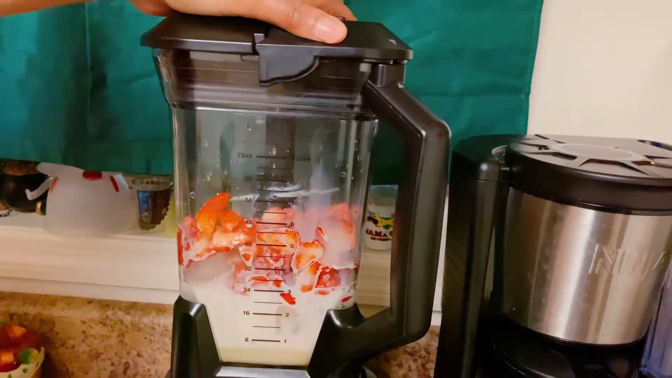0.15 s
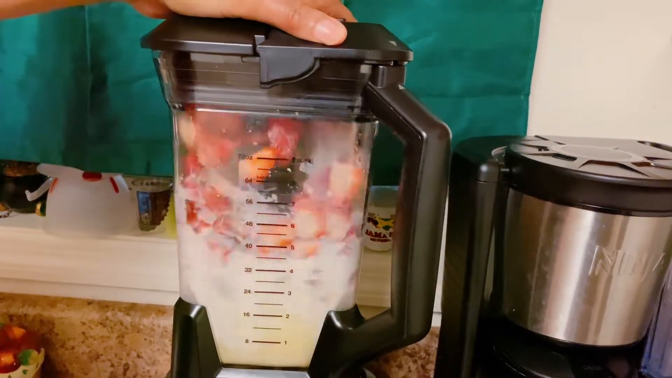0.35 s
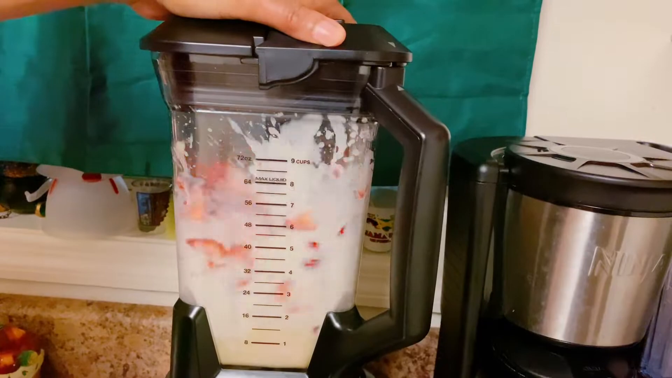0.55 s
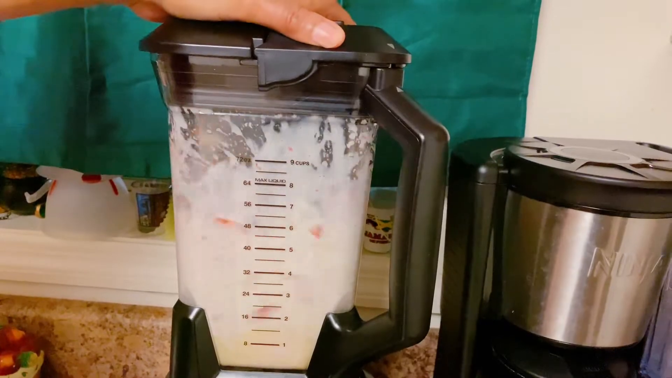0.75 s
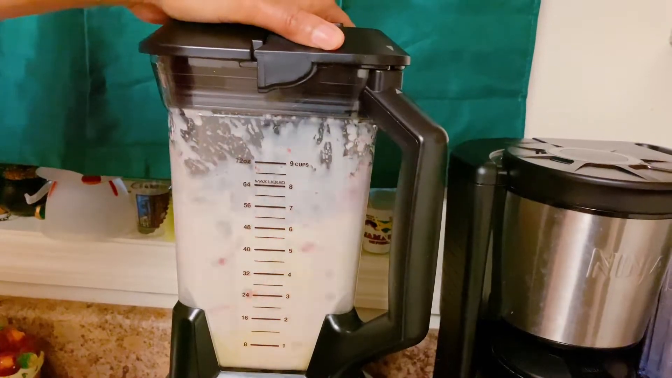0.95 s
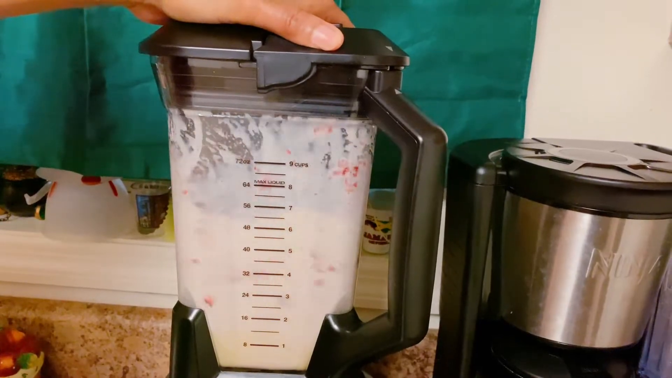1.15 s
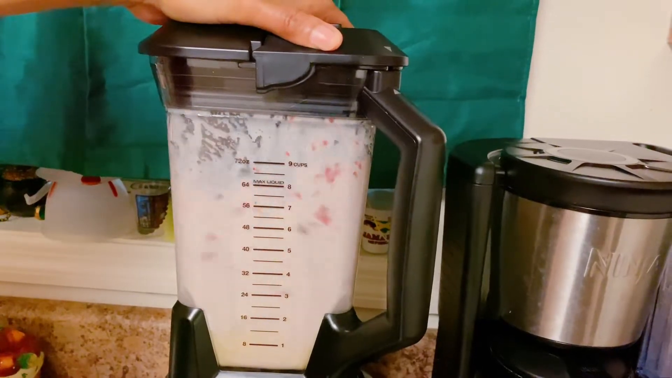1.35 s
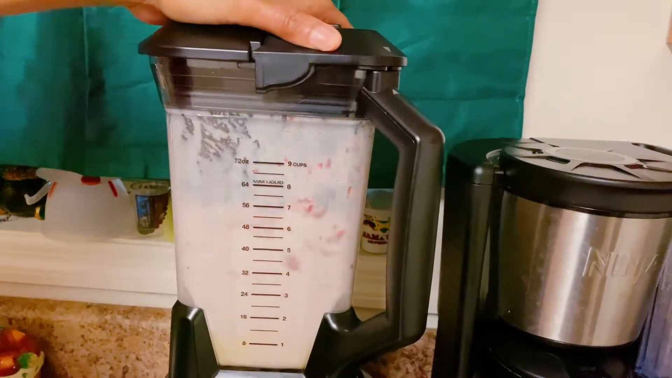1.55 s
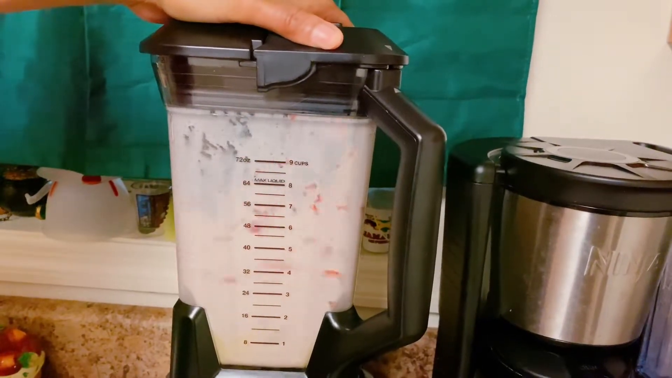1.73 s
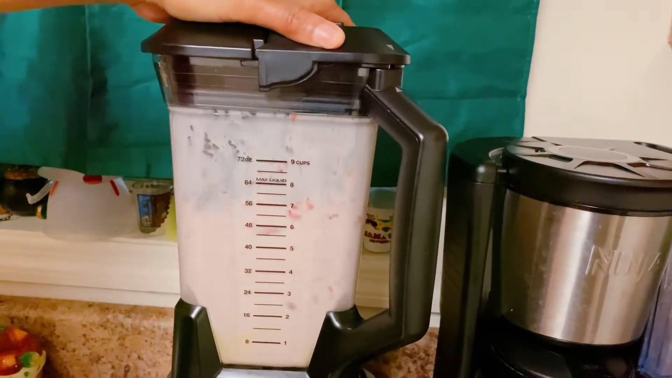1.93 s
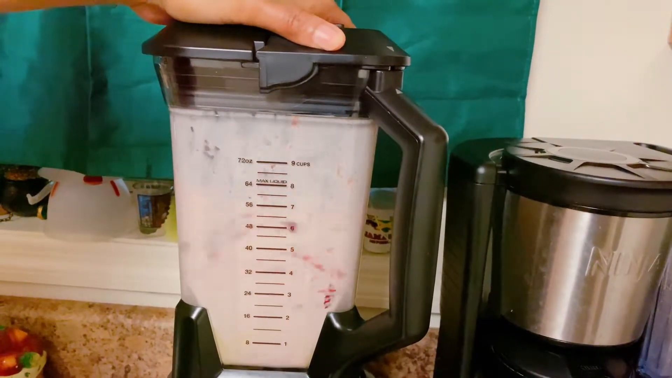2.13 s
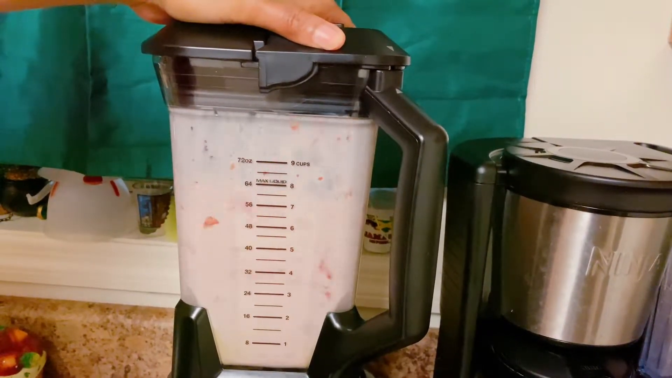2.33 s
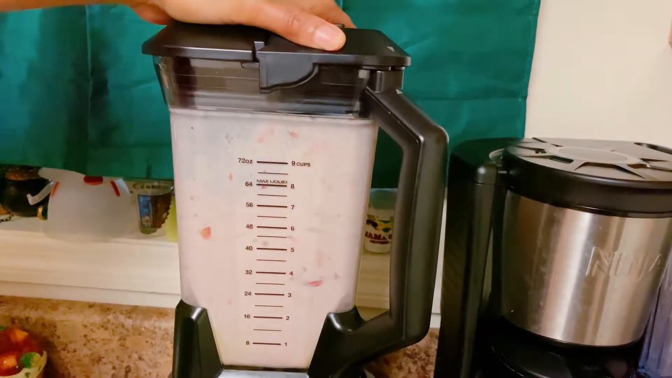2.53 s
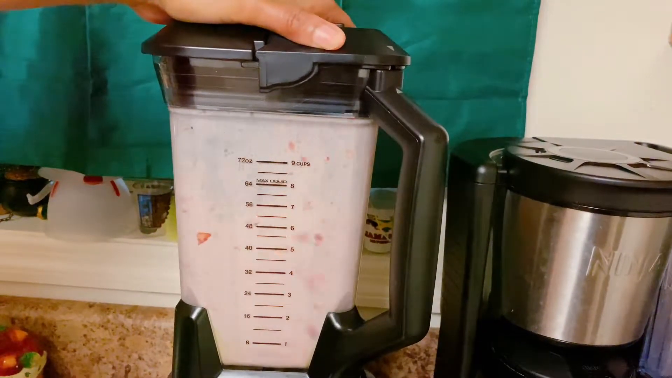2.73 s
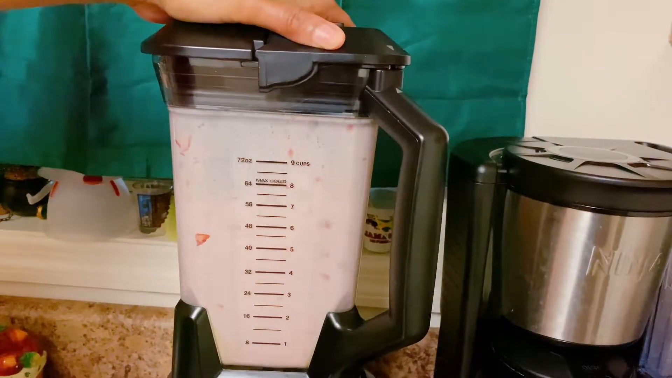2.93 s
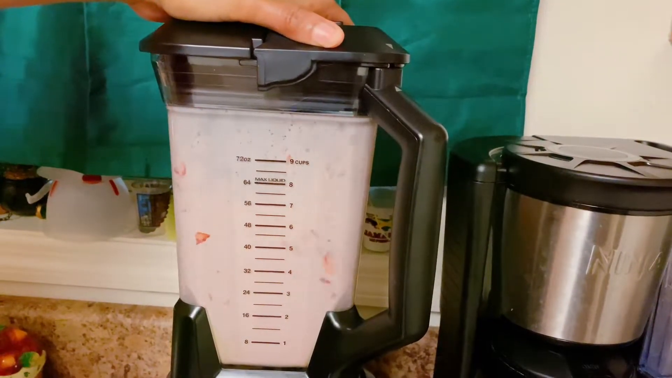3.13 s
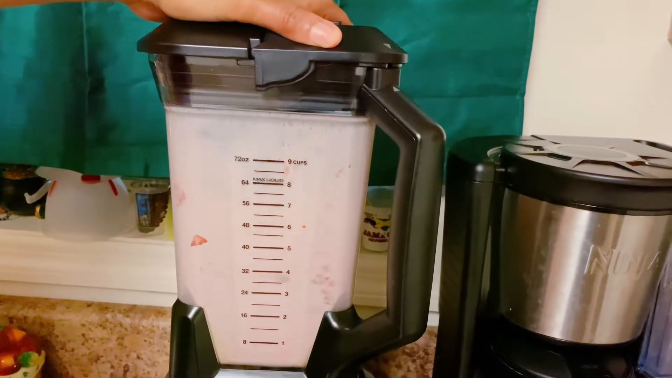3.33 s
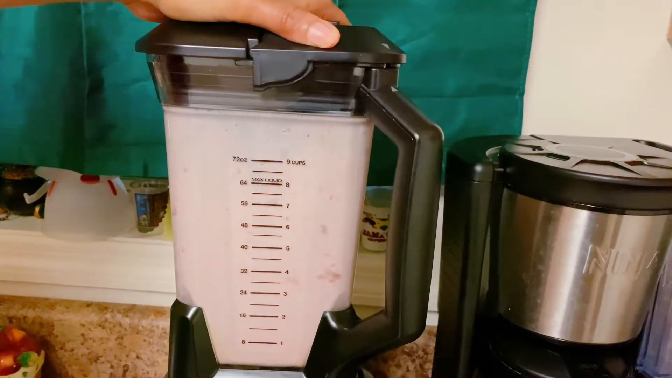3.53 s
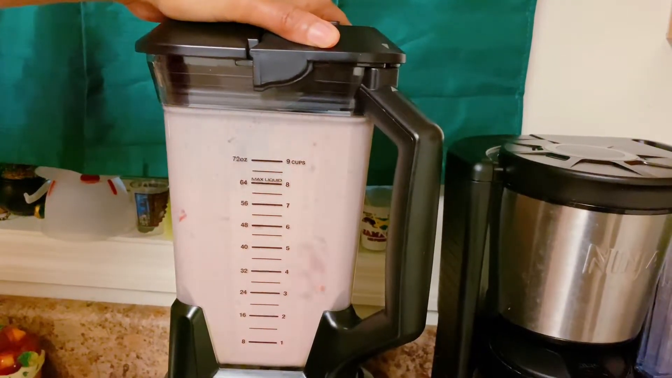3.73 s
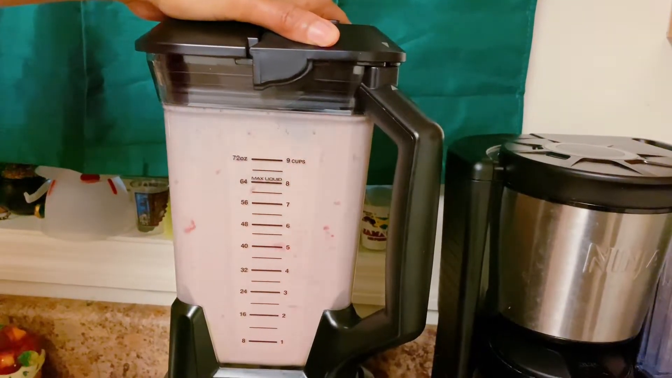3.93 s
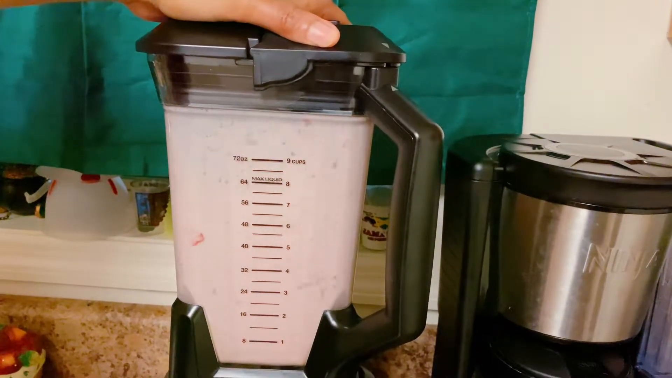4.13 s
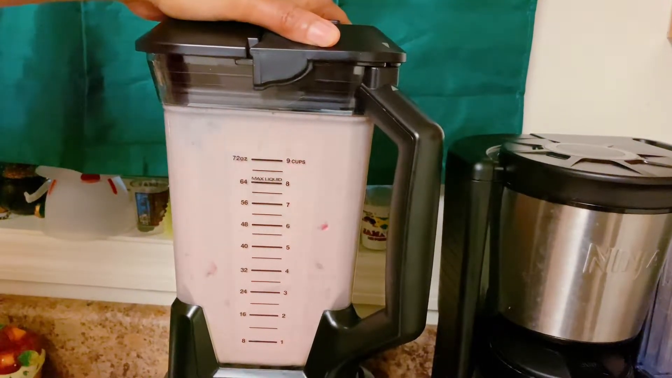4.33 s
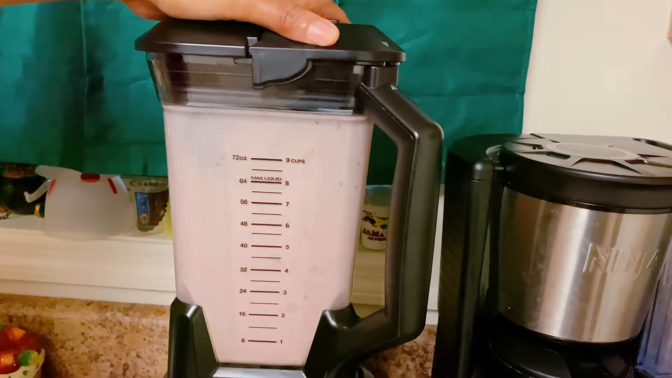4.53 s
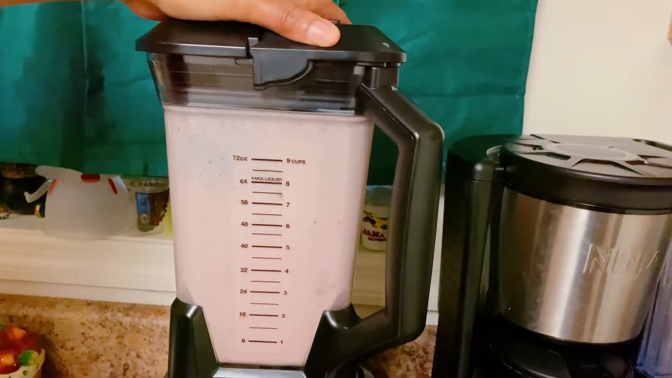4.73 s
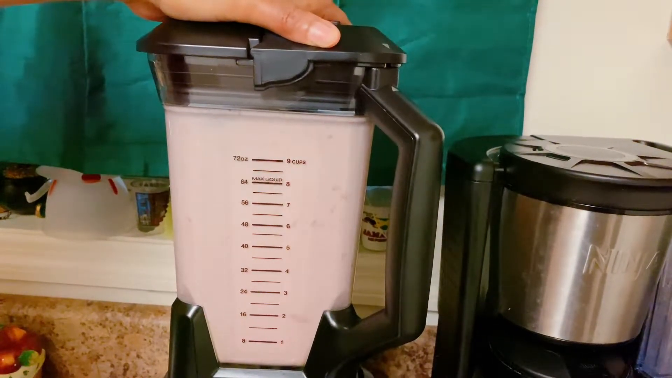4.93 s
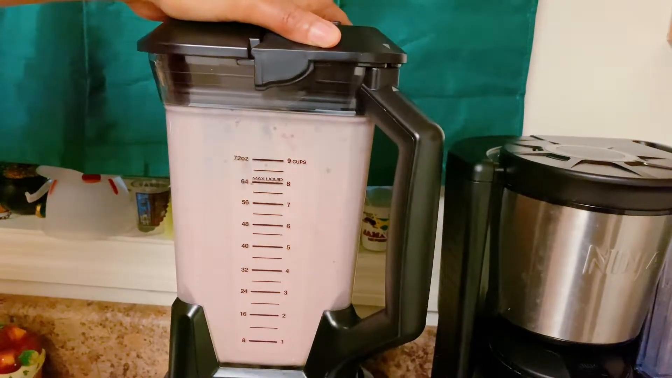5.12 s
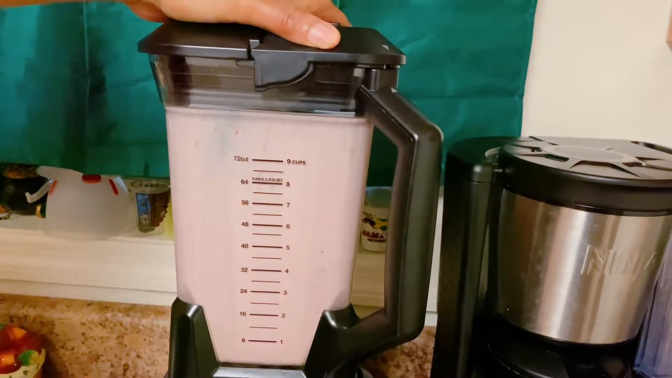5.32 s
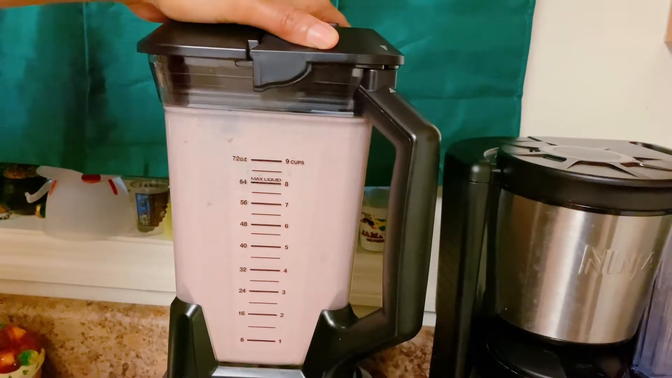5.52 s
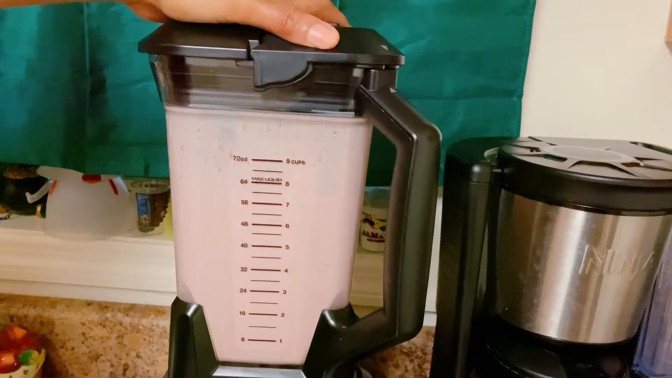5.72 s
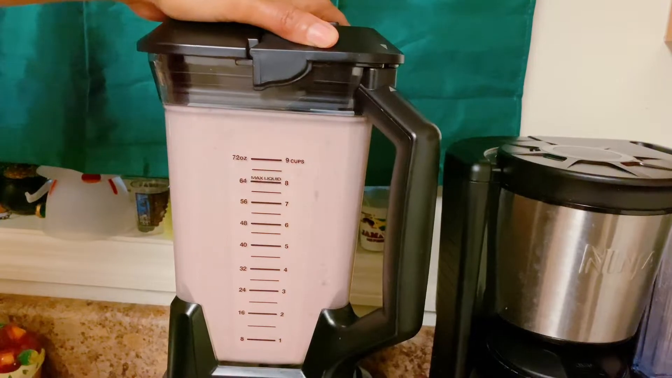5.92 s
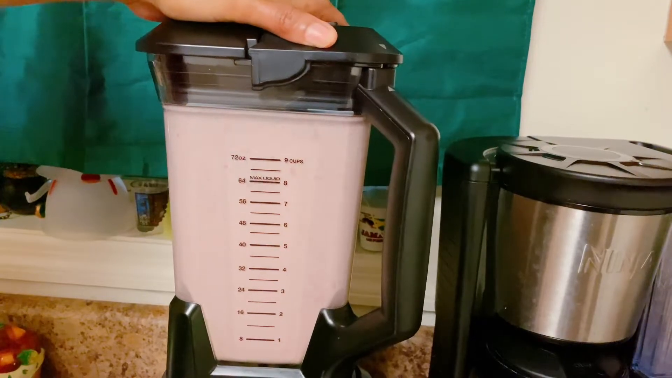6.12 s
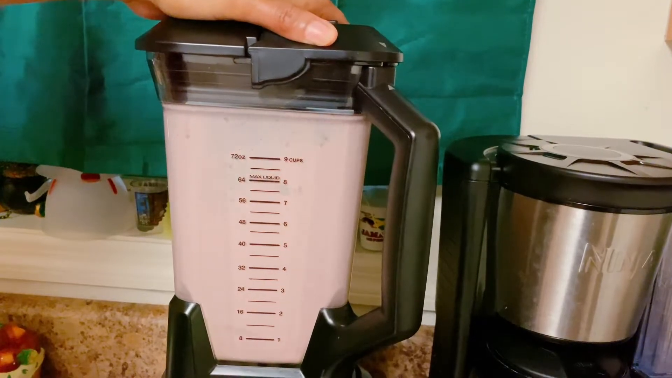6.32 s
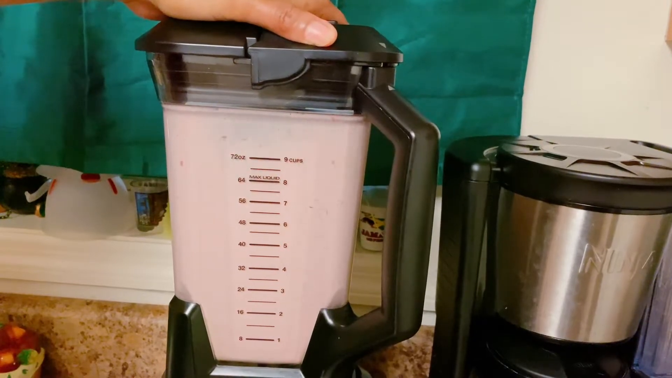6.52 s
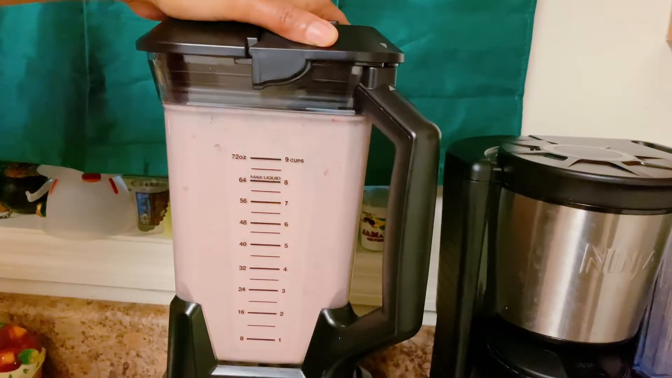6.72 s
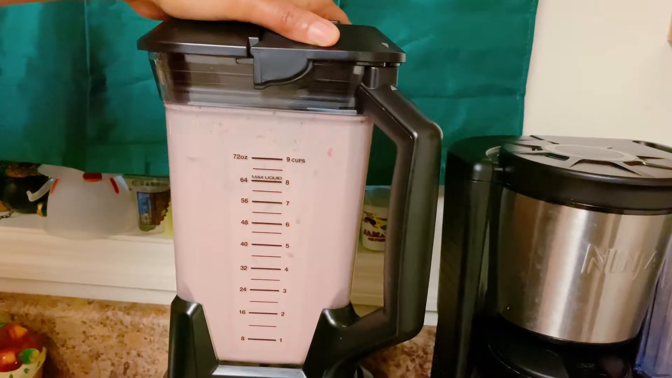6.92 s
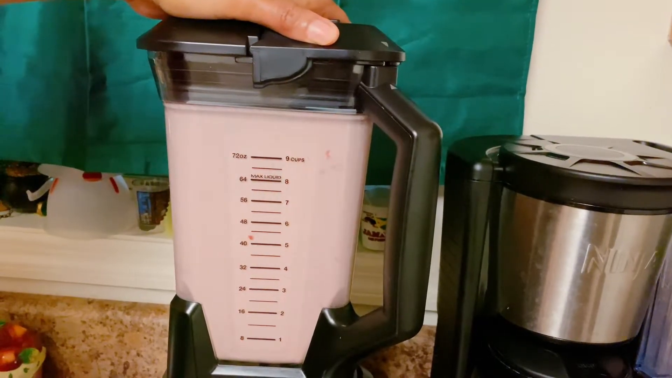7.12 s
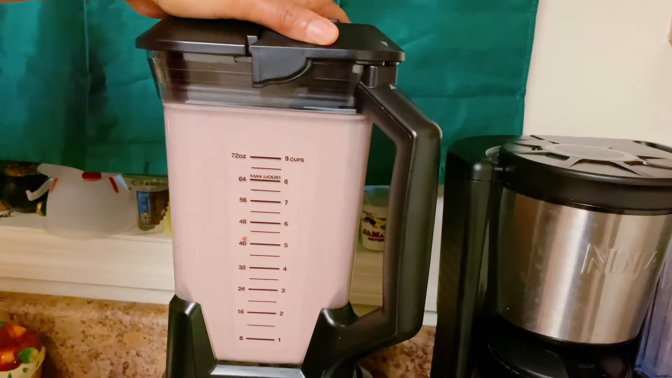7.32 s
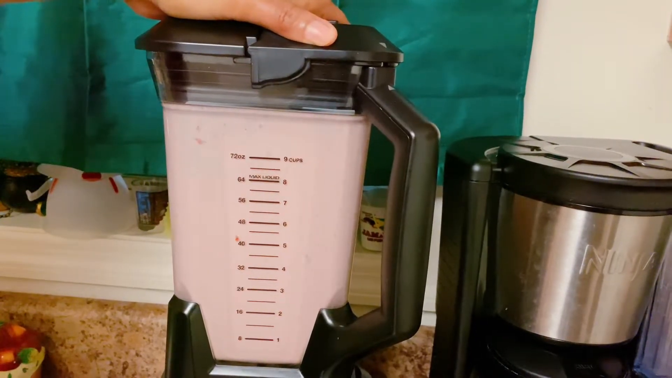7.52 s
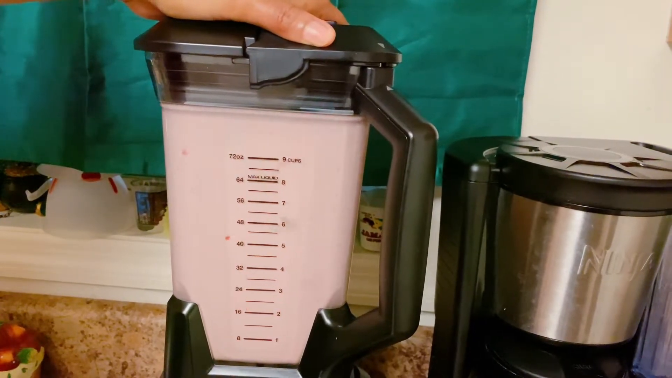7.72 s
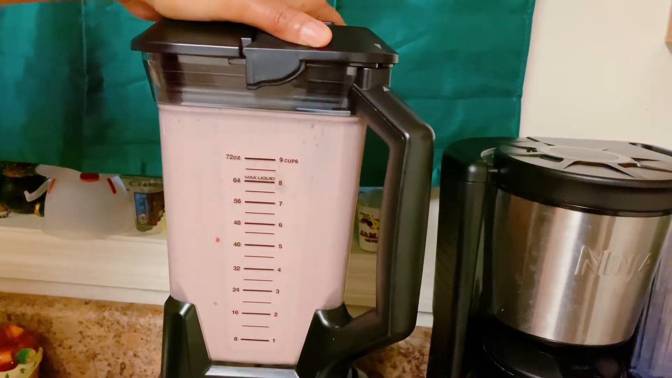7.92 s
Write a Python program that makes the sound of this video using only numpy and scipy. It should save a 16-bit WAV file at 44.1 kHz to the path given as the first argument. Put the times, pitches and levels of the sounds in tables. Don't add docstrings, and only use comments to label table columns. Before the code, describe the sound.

Close stereo sound in a small kitchen. For the first 0.1 s there is only faint refrigerator hum and dull room air, then a small plastic click with tiny bounces. At about 0.19 s the blender bursts on: the motor sweeps from a low growl to a high hum by 0.7 s, while ice chunks crack and knock hollowly on the jug, thickest until 0.6 s, with later knocks near 0.7 and 0.9 s. Chips rattle and thin out by 2 s. A loud, broad, wet roar with motor whine continues, pitch still creeping upward until about 4 s, pulsing roughly six times a second. From about 4.7 s the mix thickens: deeper surges come three times a second, each a brighter splash and hum swell followed by a sag in pitch and low jug wobble. Soft low thuds appear from 5 s, strongest near 6 and 7.9 s. It is still running at the end, about 8 s.

```python
import sys
import numpy as np
from scipy import signal
from scipy.fft import rfft, irfft, next_fast_len
from scipy.io import wavfile
from scipy.ndimage import uniform_filter1d

SR = 44100
rng = np.random.default_rng(int(sys.argv[2]) if len(sys.argv) > 2 else 0)


def persist_wave(psi):
    counts = np.round(np.clip(psi, -1, 1) * 32767).astype(np.int16)
    wavfile.write(sys.argv[1], SR, np.atleast_2d(counts).T)


def ratio_of_db(decibels):
    return 10 ** (np.asarray(decibels, float) / 20)


N = 351036
SIZE = next_fast_len(N + SR)
HZ = np.maximum(np.arange(SIZE // 2 + 1) * SR / SIZE, 1)

# frequency in Hz, level difference in dB.
LEFT_LOUDER = [(60, 4), (110, -0.5), (200, 4.5), (380, -2), (700, 9.5), (1290, 4), (2380, 2.0), (4400, 1.5),
               (8120, 1), (15000, 0.0)]
# frequency in Hz, lead in cycles.
RIGHT_LEADS = [(0, 0), (1200, 0), (2400, -.2), (4100, 0), (5400, .5), (7300, 1.0), (9250, 1.5),
               (15300, 3.0), (22050, 4.7)]
PORT_HZ, PORT_DB = np.transpose(LEFT_LOUDER)
PORTS = ratio_of_db(np.interp(np.log(HZ), np.log(PORT_HZ), PORT_DB) * [[.5], [-.5]])
LEAD = np.exp(2j * np.pi * np.interp(HZ, *np.transpose(RIGHT_LEADS)) * [[0], [1]])
SIDES = np.array([[.5], [-.5]])


def rms_one(x):
    return x / np.sqrt(np.mean(x ** 2) + 1e-20)


def in_time(rows):
    s, *columns = np.transpose(rows)
    return [np.interp(np.arange(N) / SR, s, c) for c in columns]


def at_hz(points, hz):
    points = np.array(points)
    return np.interp(np.log(hz), np.log(np.maximum(points[:, 0], 1)), points[:, 1])


def drift(rate):
    r = np.exp(-80 * np.pi * rate / SR)
    slow = signal.lfilter([1], [1, -2 * r, r * r], rng.standard_normal(N // 40 + 2002))[2000:]
    return np.interp(np.arange(N) / 40, np.arange(len(slow)), rms_one(slow))


def ring(clicks, hz, t60):
    r, w = ratio_of_db(-60 / (t60 * SR)), 2 * np.pi * hz / SR
    return signal.lfilter([0, np.sin(w)], [1, -2 * r * np.cos(w), r * r], clicks + 1e-18)


def body_noise(spectrum, patchy_db, surge_db=0, dark_db=0, count=2):
    # frequency in Hz, width in Hz, boost in dB.
    body = [(126.3, 20, 6), (191.8, 6.2, 8), (242, 12, 10), (540, 105, -0.5), (730, 43, 3), (907, 44, 4.5),
            (1028, 64, 4.5), (1235, 54, 6.5), (1851, 62, 8.5), (2446, 65, 6), (2687, 230, 3.5),
            (3210, 25, 8.5), (3404, 126, 4), (4150, 46, 6), (4330, 90, 4), (5860, 73, 5)]
    # frequency in Hz, likeness from 0 to 1.
    likeness = [(60, 0.91), (200, 0.9), (500, 0.5), (900, 0.43), (1500, 0.14), (2800, 0.23), (3600, 0.2),
                (6000, 0.36), (8000, 0.9), (9200, 0.55), (16000, 0.35)]
    body_db = sum(boost_db / (1 + (2 * (HZ - hz) / width) ** 2) for hz, width, boost_db in body)
    inside = (HZ > spectrum[0][0]) & (HZ < spectrum[-1][0])
    white = rfft(rng.standard_normal((3, SIZE)))
    alike = np.clip(at_hz(likeness, HZ), 0, 1)
    direct = np.sqrt(alike) * white[0] * LEAD
    diffuse = np.sqrt(1 - alike) * white[1:]
    coloured = (direct + diffuse) * PORTS * ratio_of_db(at_hz(spectrum, HZ) + body_db) * inside
    place, out = count * np.log2(HZ), 0
    for k in range(int(place[inside][0]), int(place[inside][-1]) + 2):
        octave = k / count - np.log2(2000)
        gain = ratio_of_db(patchy_db * drift(13.4) + surge_db * max(octave, 0) - dark_db * octave)
        band = coloured * np.clip(1 - abs(place - k), 0, 1)
        out = out + gain * irfft(band, SIZE)[:, :N]
    return rms_one(out)


def motor(speed, hum_db, whine_db):
    # multiple of shaft speed, level in dB re a fixed -28.5 dB.
    orders = [(3, -19), (4, -29.5)]
    turn = 2 * np.pi * np.cumsum(speed + 0.98 * drift(37)) / SR
    hook = .065 * uniform_filter1d(hum_db, size=1500)
    level_db = hum_db + 0.6 + 1.34 * drift(18.5) + SIDES * (2.0 + 2.8 * drift(9.4))
    out = ratio_of_db(level_db) * np.sin(turn + hook + 0.27 * SIDES)
    out += ratio_of_db(whine_db + .3 + .8 * drift(12) + SIDES * 8) * np.sin(2 * turn + 1.5 * SIDES)
    for k, db in orders:
        level_db = -28.5 + db + 5.9 * drift(16.0) + SIDES * 5.0
        out += ratio_of_db(level_db) * np.sin(int(k) * turn + 1.82 * drift(21))
    return np.sqrt(2) * out, turn


def slumps():
    # start in seconds, hold in seconds, lopsided hum in dB, load as splash in dB.
    quick = [(0.839, 0.0, -29, 0.84), (0.998, 0.042, -26.0, 2.0), (1.089, 0.053, -36, 1.32),
             (1.289, 0.0, -21.5, 2.0), (1.468, 0.04, -21.5, 2), (1.651, 0.12, -24.5, 1.17),
             (1.856, 0.07, -26, 0.5), (2.039, 0.028, -27.5, 0.4), (2.196, 0.052, -25.5, 1.46),
             (2.386, 0.022, -20.5, 2.5), (2.533, 0.076, -25.5, 1.5), (2.712, 0.038, -25, 2),
             (2.855, 0.034, -26.1, 3), (3.025, 0.061, -26, 2.5), (3.175, 0.036, -27, 2.5),
             (3.336, 0.042, -22, 3), (3.498, 0.049, -24.3, 3.5), (3.645, 0.057, -24.5, 2.5),
             (3.81, 0.018, -23.5, 4.5), (3.957, 0.049, -25.5, 2.5), (4.101, 0.017, -21.5, 2.5),
             (4.15, 0.04, -24.5, 1.5), (4.262, 0.068, -23.7, 2.5), (4.426, 0.068, -22.2, 3.5),
             (4.58, 0.011, -25, 1.4)]
    deep = [(4.742, 0.0074, -21, 5), (4.867, 0.048, -27, 1), (5.04, 0.012, -24.5, 6),
            (5.344, 0.14, -23.5, 4), (5.66, 0.02, -21.5, 4.5), (5.807, 0.0, -27, 0.0),
            (5.959, 0.0024, -20.5, 6), (6.217, 0.0, -30, 0.5), (6.299, 0.021, -22.5, 5),
            (6.391, 0.0015, -40.0, 0.9), (6.6, 0.086, -25.5, 3), (6.686, 0.073, -39, 0.8),
            (6.905, 0.036, -22.5, 5), (7.041, 0.0, -26.5, 1.1), (7.209, 0.03, -22.5, 4),
            (7.303, 0.048, -26.5, 1), (7.512, 0.014, -23, 6), (7.629, 0.014, -28, 1),
            (7.843, 0.019, -24.5, 6)]
    # time in seconds, splash in dB.
    crunches = [(.688, 2), (.83, 1), (.916, 0.5), (1.3, 4.5), (1.874, 2), (2.848, 2)]
    splash_s, crunch_s = .037, 0.012
    hum_rise_s, hum_fall_s = 0.037, .035
    drag_lag_s, drag_hz_per_s, recover_s = 0.01937, 121, .244
    t = np.arange(0, N + 40, 40) / SR
    s, hold, db, load = np.vstack([quick, deep]).T[:, :, None]
    away = np.minimum(t - s, 0) / hum_rise_s + np.maximum(t - s - abs(hold), 0) / hum_fall_s
    hum = np.sum(ratio_of_db(db - 10 * away ** 2) ** 2, axis=0)
    splash = np.sum(load * np.exp(-((t - s) / splash_s) ** 2), axis=0)
    for at, crunch_db in crunches:
        splash += crunch_db * np.exp(-((t - at) / crunch_s) ** 2)
    drag = drag_hz_per_s * np.sum(load * np.exp(-((t - s - drag_lag_s) / splash_s) ** 2), axis=0)
    sag = signal.lfilter([t[1]], [1, -np.exp(-t[1] / recover_s)], drag)
    return [np.interp(np.arange(N) / SR, t, c) for c in (hum, splash, sag)]


def churn(turn, roar_db, rumble_db, heavy_db):
    # frequency in Hz, level in dB per Hz.
    roar_spectrum = [(250, -12), (350, -10.5), (550, -11.5), (800, -11.5), (1250, -11), (1450, -14),
                     (2600, -12), (4000, -15), (6000, -15), (7800, -23.5), (10000, -22), (12300, -22),
                     (15500, -26), (16500, -48)]
    # frequency in Hz, level in dB per Hz.
    rumble_spectrum = [(18, -60), (30, -31), (119, -5), (156, -7.5), (241, -1.5), (274, -1), (285, -3.5),
                       (370, -10), (630, -120)]
    throb = 1 + 0.18 * np.sin(turn)
    jolts = ratio_of_db(0.7 * drift(42))
    surge = roar_db - uniform_filter1d(roar_db, size=SR // 2)
    roar = body_noise(roar_spectrum, patchy_db=0.82, surge_db=0.11 * surge, dark_db=heavy_db)
    rumble = body_noise(rumble_spectrum, patchy_db=0.5, count=1)
    return throb * jolts * ratio_of_db(roar_db + 5.0) * roar + ratio_of_db(rumble_db + 0.96) * rumble


def ice():
    # time in seconds, peak in dB, pitch in Hz.
    chunks = [(0.192, -11, 830), (0.197, -10, 970), (0.209, -6, 896), (0.234, -21, 680), (0.244, -20, 780),
              (0.277, -7.5, 1060), (0.334, -16, 1090), (0.424, -16, 1010), (0.444, -23, 1018),
              (0.489, -26, 519), (0.516, -19, 785), (0.56, -10.5, 790), (0.688, -12, 1069),
              (0.913, -8.5, 900), (2.844, -21, 661)]
    # time in seconds, peak in dB, pitch in Hz.
    slams = [(.196, -18, 480), (.212, -13, 390), (.195, -7.5, 238), (0.239, -9, 253), (.318, -11, 248),
             (0.361, -10, 228), (0.414, -10, 230)]
    # time in seconds, chips per second, level in dB.
    crumbs = [(.19, 1200, -26), (.6, 800, -30), (1.2, 500, -37), (2, 400, -42), (7.96, 400, -43)]
    out, t, knocks = np.zeros(N), np.arange(3000) / SR, chunks + slams
    cracks = signal.lfilter([.5], [1, -.6], rng.standard_normal((len(knocks), len(t))))
    for (s, db, hz), crack in zip(knocks, cracks):
        knock = np.sin(2 * np.pi * hz * t) * ratio_of_db(-60 * t * hz / 22) + .8 * crack * ratio_of_db(-60 * t / .015)
        out[round(s * SR):][:len(t)] += ratio_of_db(db - 6) * knock
    per_s, chips_db = in_time(crumbs)
    sizes = ratio_of_db(3.7 * np.minimum(rng.exponential(1, N), 4)) * rng.choice([-1, 1], N)
    sizes = sizes * (rng.random(N) < per_s / SR)
    dealt = rng.integers(0, 16, N)
    pitches = np.geomspace(750, 11000, 16)
    chips = sum(ring(sizes * (dealt == k), hz, 12.3 / hz) for k, hz in enumerate(pitches))
    return out, ratio_of_db(chips_db) * chips / np.sqrt(per_s / 300)


def rocking(dip):
    t = np.arange(N) / SR
    lag_s, db_per_hz = .1, 0.71
    swell_db = db_per_hz * np.interp(t - lag_s, t, dip) + 2.1 * drift(5.3)
    phase = 2 * np.pi * np.cumsum(185.7 + 5 * drift(5)) / SR
    return ratio_of_db(-45.5 + swell_db) * np.sin(phase) * ratio_of_db([[1.5], [-1.5]])


def thuds():
    # start in seconds, peak in dB.
    hops = [(.22, -42), (.75, -36), (5.07, -45), (5.97, -33), (6.349, -36), (6.95, -39), (7.55, -36.5),
            (7.87, -32.5)]
    out, t = np.zeros(N + SR), np.arange(SR // 4) / SR
    push = np.sin(2 * np.pi * 55 * t) * t / 0.011 * np.exp(1 - t / 0.0096)
    for s, db in hops:
        out[round(s * SR):][:len(t)] += ratio_of_db(db) * push
    return out[:N]


def button():
    # time in seconds, peak in dB.
    contacts = [
        (0.0987, -34),
        (0.1004, -23.5),
        (.108, -37),
        (.125, -39),
        (.176, -36),
    ]
    # frequency in Hz, level in dB, t60 in seconds.
    modes = [(920, -1, .04), (1650, -14, .01), (2850, 3, .015), (3200, 5, .04)]
    at = [round(s * SR) for s, _ in contacts]
    db = np.array(contacts)[:, 1]
    clicks = np.zeros(N)
    clicks[at] = ratio_of_db(db)
    snap = np.diff(rng.standard_normal(400), prepend=0) * ratio_of_db(-60 * np.arange(400) / SR / 0.023)
    out = np.convolve(clicks, snap)[:N]
    for hz, level_db, t60 in modes:
        clicks[at] = ratio_of_db(db + level_db - 8.5 + rng.normal(0, 3.3, len(at)))
        out += ring(clicks, hz, t60)
    return out


def kitchen(x, wet_db, t60):
    # frequency in Hz, level in dB.
    wet = [(60, -9), (300, -6), (450, 2), (700, -4), (2400, 0), (8000, -6.5), (15000, -14)]
    t = np.arange(SR // 2) / SR
    tails = rng.standard_normal((2, len(t))) * ratio_of_db(-60 * t / t60) * (t > .002)
    tails /= np.sqrt(np.sum(tails ** 2, axis=1, keepdims=True))
    paths = LEAD + ratio_of_db(at_hz(wet, HZ) + wet_db) * rfft(tails, SIZE)
    return irfft(rfft(x, SIZE) * paths * PORTS, SIZE)[:, :N]


def background():
    # frequency in Hz, level in dB.
    fridge = [(59.5, -55), (119, -64), (237, -63)]
    # frequency in Hz, level in dB per Hz.
    air = [(30, -14), (100, -14), (170, -18), (300, -5), (560, -3), (800, -14), (2500, -30)]
    lines = sum(ratio_of_db(db + 6) * np.sin(2 * np.pi * hz * np.arange(N) / SR) for hz, db in fridge)
    return lines * ratio_of_db([[.8], [-.8]]) + ratio_of_db(-60) * body_noise(air, patchy_db=2, count=.5)


def scene():
    # time in seconds, roar in dB.
    churning = [(0.188, -20), (0.196, -23.5), (0.372, -29), (.63, -28.5), (1.05, -32), (2, -31), (4, -32.5),
                (7.96, -33)]
    # time in seconds, speed in Hz, unbalance hum in dB.
    spin_up = [(0.19, 55.2, -55), (0.22, 71, -34), (0.256, 83.6, -45), (0.28, 94.68, -26),
               (0.342, 143.9, -43), (0.42, 206.7, -28), (0.466, 242.7, -43), (0.505, 260.2, -21.5),
               (0.7, 292, -42)]
    # time in seconds, speed between slumps in Hz, steady hum in dB.
    run_on = [(.8, 302.5, -35.5), (1.02, 316, -36), (1.5, 332.2, -28.5), (2, 329.5, -33.5), (3, 348.7, -36),
              (4, 359.6, -36), (5, 351.1, -35.5), (6, 348.2, -37), (7, 353.7, -33), (7.96, 354.7, -39.5)]
    # time in seconds, level in dB.
    whine = [(.19, -43), (1, -40), (1.6, -40), (1.9, -35), (3, -36), (4, -36.5), (5, -36.5), (6.2, -39),
             (6.8, -36.5), (7.4, -37.5), (7.96, -42.5)]
    # time in seconds, downward tilt in dB per octave.
    heavy = [(.19, 3.5), (.3, 3.5), (.5, 2.3), (1, 1.5), (1.5, 1.72)]
    t = np.arange(N) / SR - churning[0][0]
    running = np.clip(t / 0.0046, 0, 1)
    hum, splash_db, sag = slumps()
    speed, steady_db = in_time(spin_up + run_on)
    dip = sag - uniform_filter1d(sag, size=SR // 2)
    hum_db = 10 * np.log10(hum + ratio_of_db(steady_db - 0.37 * dip) ** 2)
    tones, turn = motor(speed - sag, hum_db, *in_time(whine))
    chunks, chips = ice()
    rumble_db = -36.5 + 7 * np.exp(-abs(t) / 0.43) + 0.16 * dip + 1.5 * drift(6.7)
    mix = running * churn(turn, in_time(churning)[0] + splash_db, rumble_db, *in_time(heavy))
    knocks = kitchen(running * chips + chunks + button(), wet_db=1.5, t60=.25)
    ducked = ratio_of_db(-8 * running)
    return running * tones + knocks + mix + thuds() + ducked * background() + running * rocking(dip)


def top_cut(x):
    return signal.sosfilt(signal.butter(12, 16840, fs=SR, output="sos"), x)


def record(dry):
    bass_cut = signal.butter(2, 62, "high", fs=SR, output="sos")
    heard = signal.sosfilt(bass_cut, dry)
    return top_cut(heard)


dry = scene()
out = record(dry)
persist_wave(out)
```